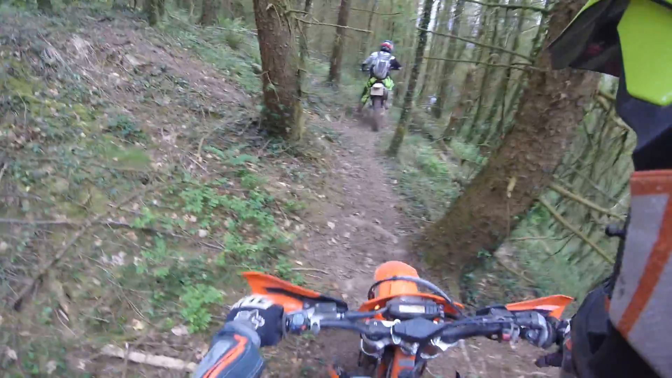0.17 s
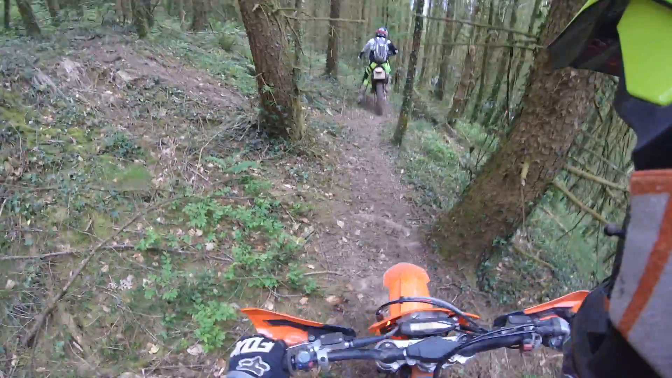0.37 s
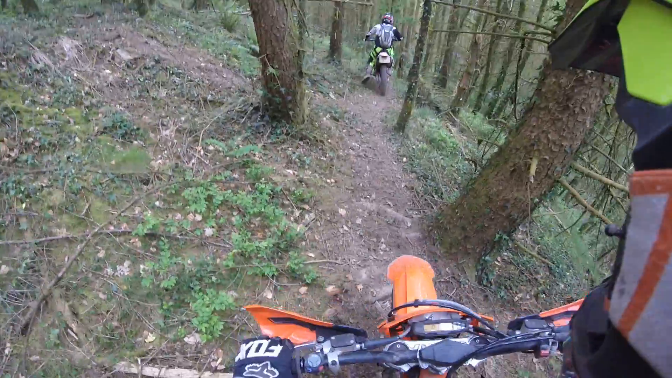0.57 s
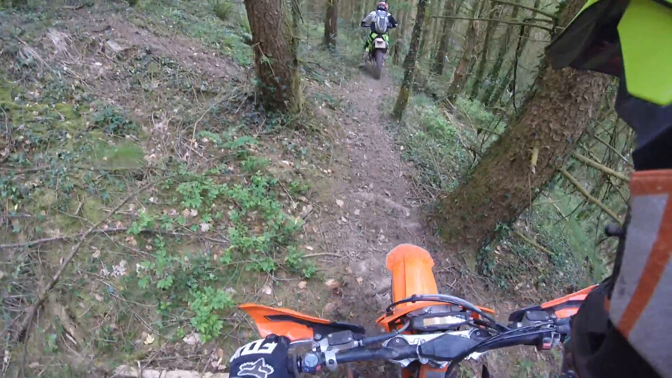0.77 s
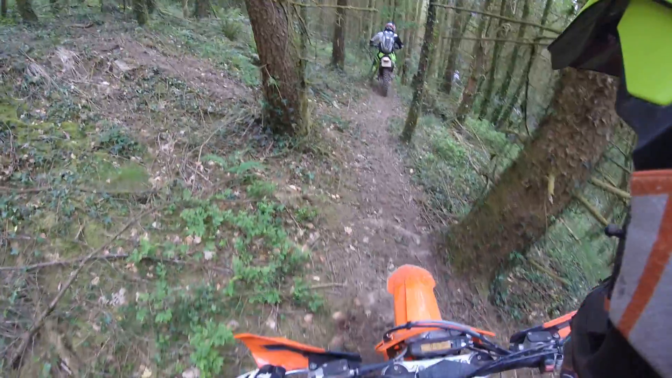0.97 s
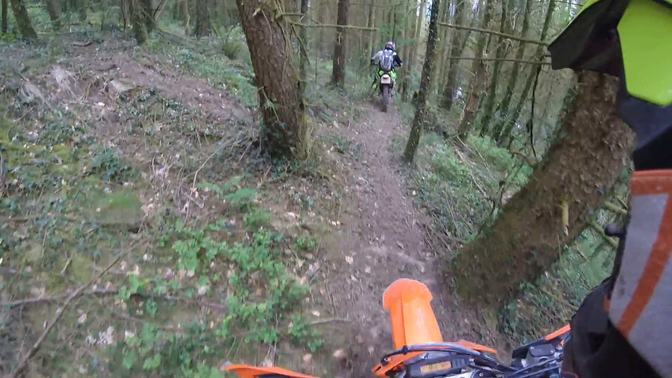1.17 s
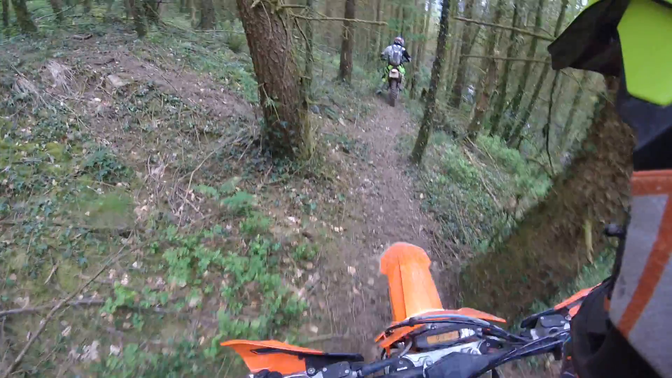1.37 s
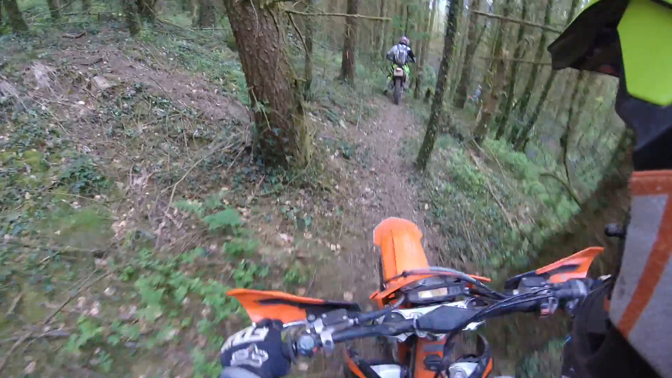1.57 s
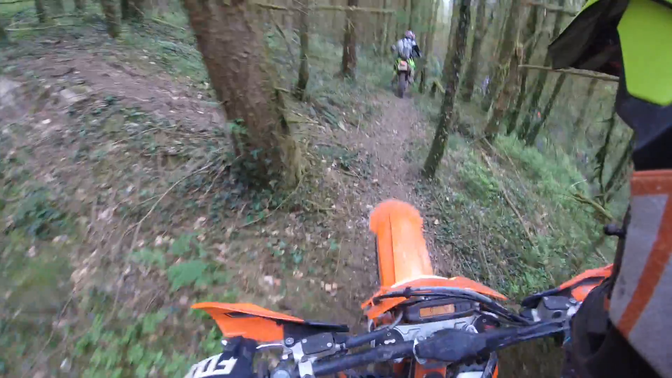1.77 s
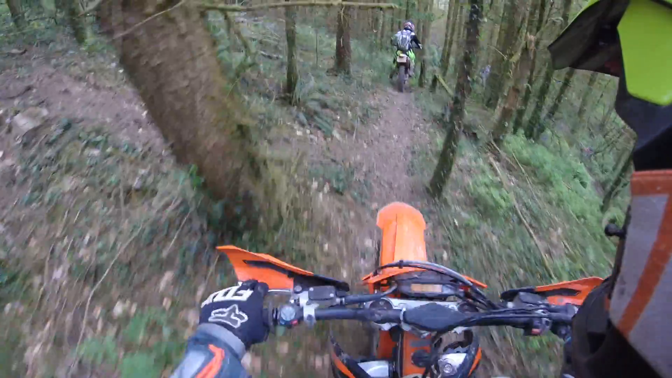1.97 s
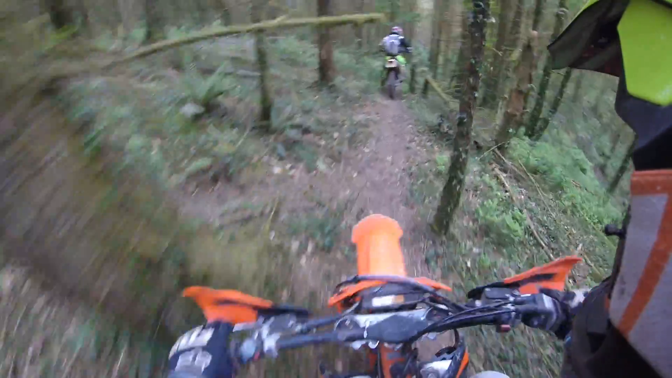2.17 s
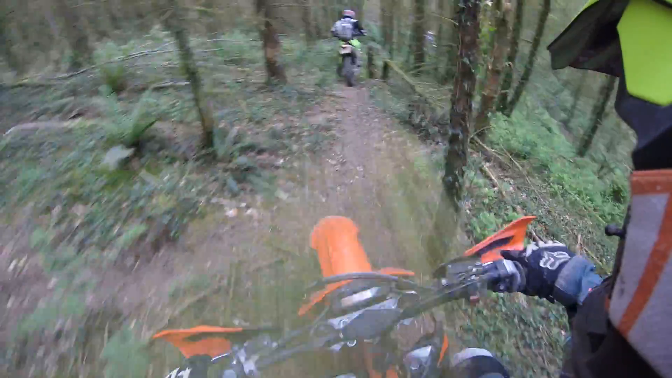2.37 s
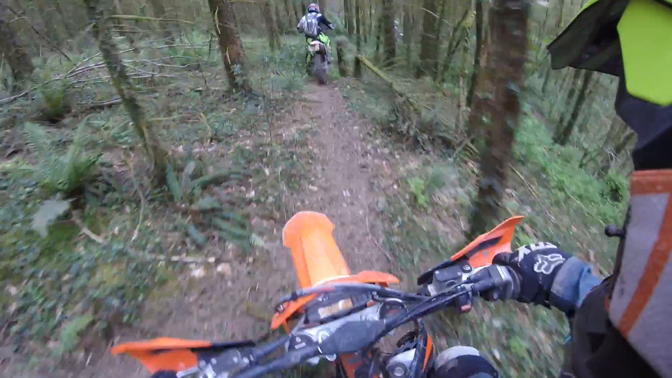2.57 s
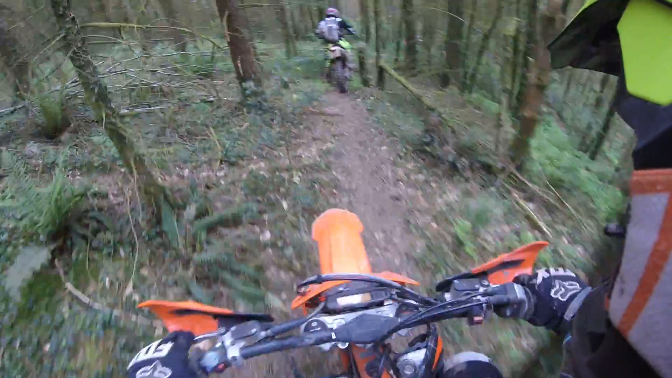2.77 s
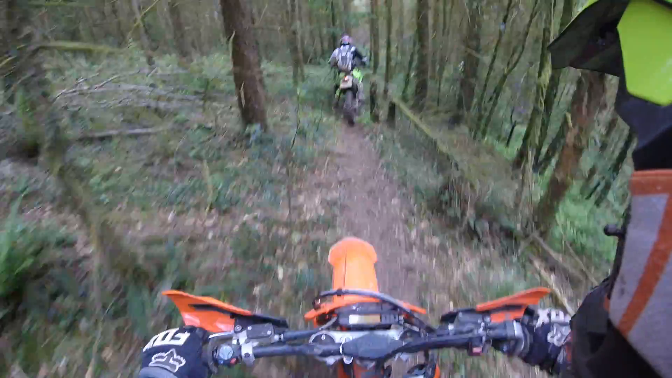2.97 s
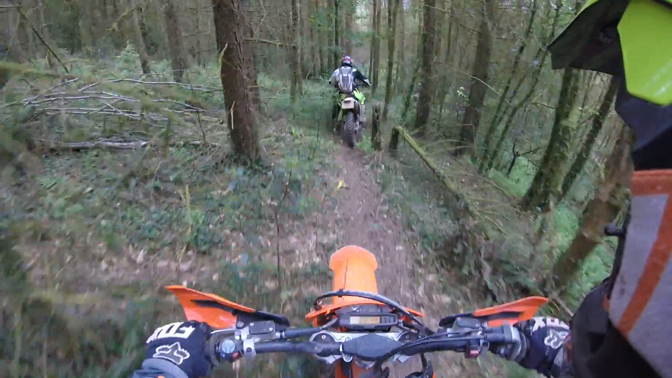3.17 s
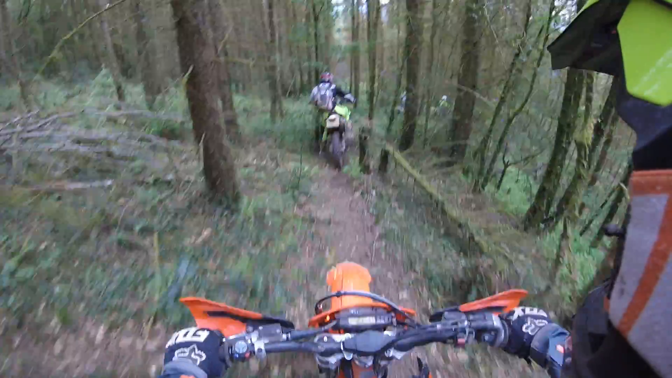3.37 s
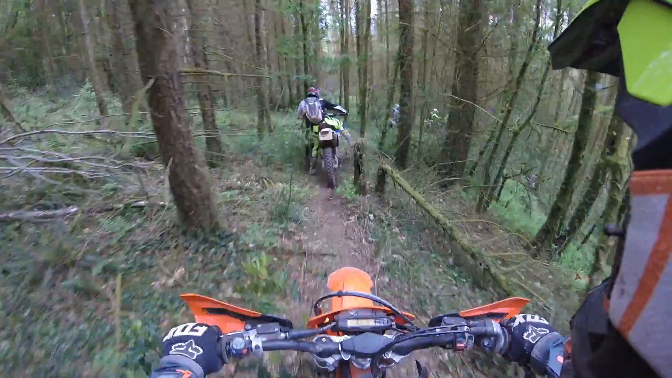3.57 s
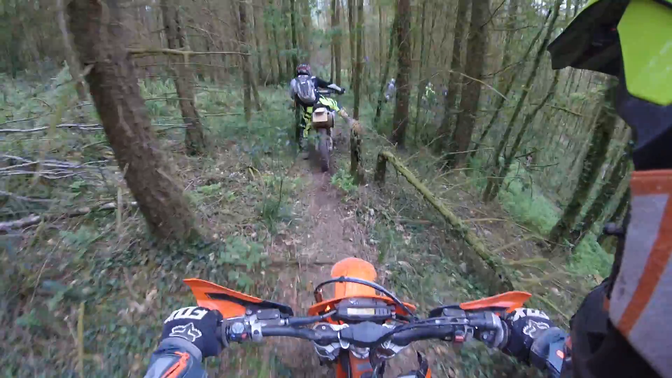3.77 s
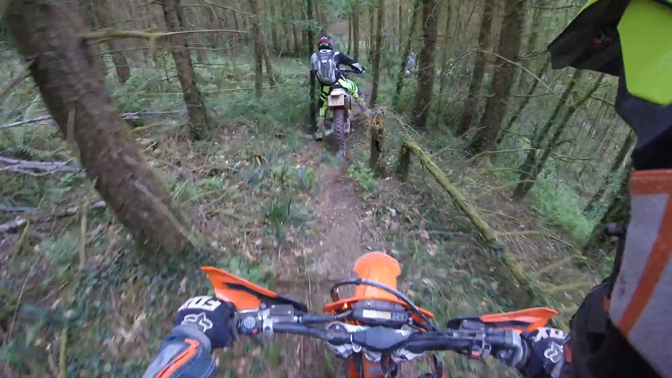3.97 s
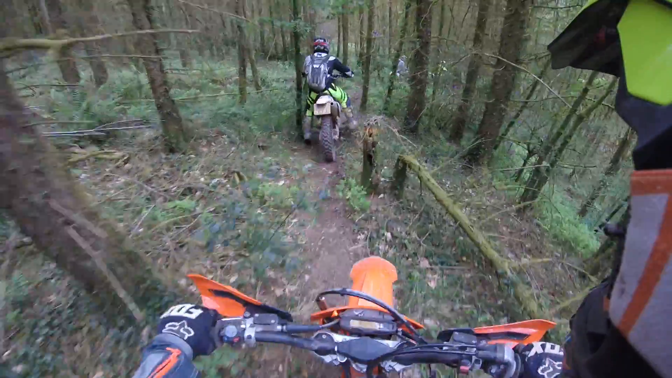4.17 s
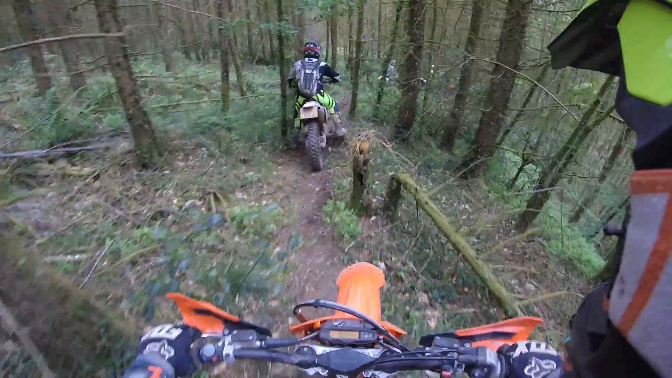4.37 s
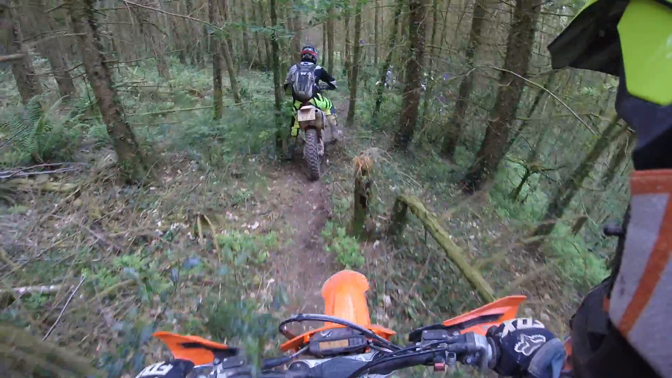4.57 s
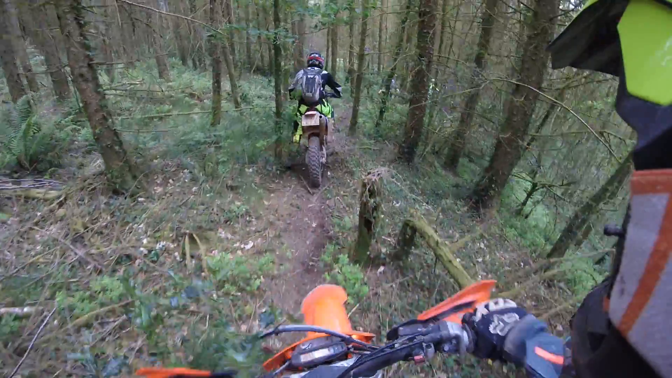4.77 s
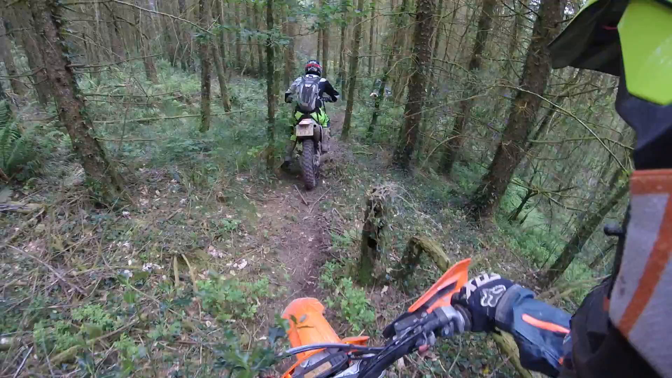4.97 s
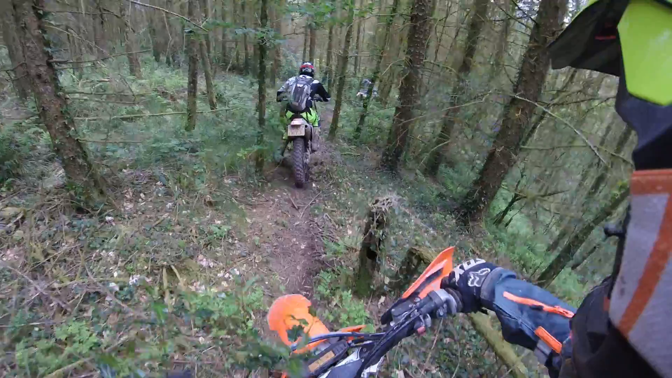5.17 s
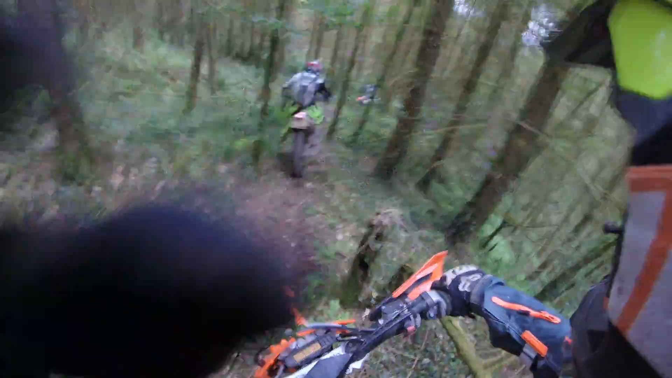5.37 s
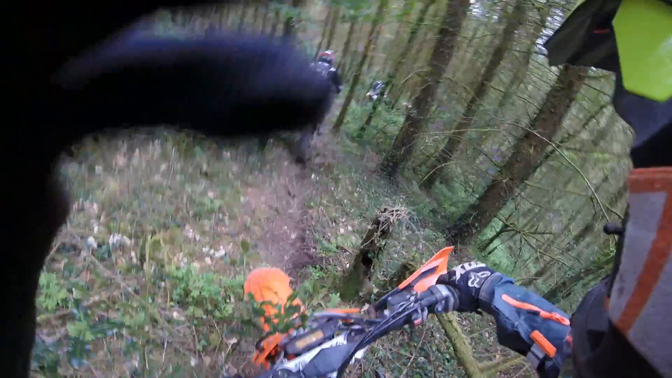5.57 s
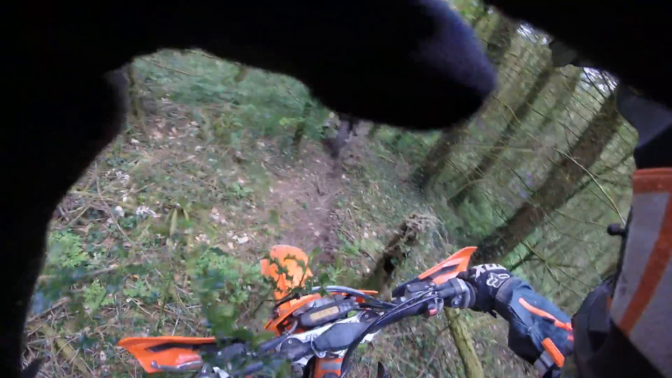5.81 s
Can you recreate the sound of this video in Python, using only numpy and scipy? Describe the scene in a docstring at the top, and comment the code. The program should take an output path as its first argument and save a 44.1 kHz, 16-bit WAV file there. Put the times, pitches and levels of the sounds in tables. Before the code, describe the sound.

A two-stroke dirt bike is heard close up on a woodland trail, boxy through a helmet microphone's closed plastic housing. It starts quietly, with a clattering, misfiring idle and a few light taps. At about 0.8 seconds it blips, then from 1.1 to 2.4 seconds pulls with a wavering, ringing buzz and exhaust hiss. Around 2 seconds a quick cluster of sharp cracks strikes the housing, followed by a gust and a thudding knock at 2.6. The engine falls back to a rattling idle with irregular spitting pops and occasional tiny twig ticks. At 5.5 seconds a gloved hand lands on the housing with the loudest thump and a short scrape, then rubs and clicks again around 5.75. Underneath throughout are low, gusty wind rumble, faint dull tyre crunch and the soft thumping idle of a four-stroke bike ahead.

```python
"""A trail through a wood, heard from a helmet camera in a closed housing on a two-stroke trail bike.
The engine misfires at idle, pulls briefly and idles again: its case clatters, and each firing rings
the pipe and spits hiss. Twigs and jolts knock the plastic housing; at the end a gloved hand lands
on it and wipes it. Underneath, an idling four-stroke thumps ahead, wind rumbles at the housing's
port and the tyres crunch."""
import sys
import numpy as np
from scipy import signal
from scipy.fft import rfft, irfft
from scipy.io import wavfile
from scipy.ndimage import uniform_filter1d, minimum_filter1d

SR = 44100
rng = np.random.default_rng(int(sys.argv[2]) if len(sys.argv) > 2 else 0)


def log_audio(samples):
    """Write samples as a 16-bit WAV file to the path given in sys.argv[1]."""
    # one column per channel
    frames = np.atleast_2d(samples).T
    # limit to full scale, then quantise
    limited = np.clip(frames, -1, 1)
    pcm = np.round(limited * 32767).astype(np.int16)
    wavfile.write(sys.argv[1], SR, pcm)


N = 257544
T = np.arange(N) / SR

# two-stroke crank through idle, blip, pull and idle: t/s, speed/(turns/s)
CRANK_SPEED = [(0.0, 25.0), (0.7, 24.5), (0.83, 38.8), (0.92, 39.0), (1.08, 31.11), (1.13, 33.35),
               (1.29, 40.39), (1.48, 35.38), (1.7, 31.6), (1.81, 35.61), (1.97, 32.84), (2.11, 37.16),
               (2.24, 33.73), (2.42, 36.93), (2.75, 29.2), (3.05, 24.9), (3.65, 27.3), (4.4, 24.3),
               (5.45, 26.5)]
# start and end of the pull, throttle open and every turn firing: t/s
THROTTLE_OPEN = [(1.09,), (2.41,)]
# lone firings of the stumbling idle: t/s, hiss level/dB, pulse level/dB
IDLE_POPS = [(0.117, -60, -54), (0.3203, -69, -52), (0.4502, -55, -51), (0.566, -54, -65),
             (0.6926, -49, -53), (0.783, -74, -33.5), (0.8276, -57, -36.5), (0.861, -55, -29.5),
             (0.8846, -44.5, -30.5), (0.9134, -60, -34), (0.9632, -45, -27), (1.0177, -43.5, -35),
             (1.075, -50, -32.5), (1.132, -47.5, -70), (2.552, -46, -52.5), (2.722, -44.5, -42),
             (2.895, -46, -45), (3.037, -43, -48), (3.1325, -48.5, -44), (3.253, -43, -41),
             (3.4071, -45, -41), (3.5608, -43.5, -42), (3.7435, -44.5, -38.5), (3.8, -53, -62),
             (3.8308, -48.5, -46), (3.875, -50, -50), (3.9265, -47, -40), (4.0914, -44.5, -39),
             (4.29, -45, -43), (4.4528, -48, -40), (4.568, -48.5, -56.5), (4.774, -46, -41),
             (4.941, -46, -37), (5.0963, -45, -39), (5.13, -54, -61), (5.2498, -46.5, -57),
             (5.3716, -45, -66.5), (5.401, -42, -56), (5.4273, -59, -58)]
# ring of the expansion chamber: f/Hz, relative level/dB, t60/s
PIPE_MODES = [(258, 6, 0.055), (345, 0, 0.045), (440, -3, 0.04), (530, -6, .035), (612, -3, 0.05)]
# colour of the exhaust spit: f/Hz, relative level/dB
HISS_EQ = [(700, -6.5), (1100, -29), (1500, 7.5), (2100, -14.5), (3000, -0.5), (4200, -14), (5300, -24),
           (6100, -11), (7200, -18.5), (8400, -15.5), (10000, -26.5), (15000, -38)]
# engine case clatter, before crank speed lifts or lowers it: t/s, level/dB
CLATTER_FADER = [(0, -58.5), (.2, -54), (.46, -49.5), (.76, -45.5), (.9, -46.5), (1.5, -44.5), (2.2, -42),
                 (2.6, -45.5), (3.5, -45.5), (5.2, -43)]
# colour of the clatter: f/Hz, relative level/dB
CLATTER_EQ = [(210, -5.5), (350, -11), (700, -8.5), (1000, -13), (1470, -9), (2130, -12), (2930, -5.5),
              (5290, -26.5), (6110, -23.5), (8410, -29), (14700, -50), (15900, -52)]
# boxy peaks the air in the housing gives the clatter: f/Hz, width/Hz, lift/dB
HOUSING_PEAKS = [(1463, 243, 15.5), (2603, 196, 7.5), (4470, 830, 0.5), (6090, 230, 8.5), (8100, 180, 0.5)]

# hits on the housing: t/s, crack/dB, rattle t60/s, crack low edge/Hz, thud/dB, contact/ms, sway/dB
HOUSING_HITS = [(.018, -39.5, 0.076, 550, -41.5, 4.8, -70), (0.083, -33.5, 0.016, 614, -37.5, 1.8, -68),
                (0.241, -44.5, 0.048, 530, -38.5, 1.4, -68), (0.315, -56, .03, 437, -46, 2.3, -74),
                (1.953, -2, 0.053, 1596, -30.5, 4.5, -75), (1.975, -22, 0.025, 1300, -73, 2.5, -69),
                (2.043, -19, 0.056, 1190, -45, 4.5, -70), (2.057, -13.5, 0.019, 1370, -34, 5.9, -70),
                (2.068, -20, 0.01, 1120, -70, 2.3, -70), (2.078, -18.5, 0.024, 1750, -34.5, 6.5, -70),
                (2.607, -17, 0.024, 990, -11, 3.34, -27), (3.037, -31.5, 0.064, 1140, -70, 2.5, -70),
                (5.527, -24, 0.048, 1180, 5.5, 7.54, -13), (5.534, -4.5, 0.014, 1310, -70, 3.9, -76),
                (5.741, -16, 0.0081, 1940, -23, 9.3, -24), (5.748, -8.5, 0.0078, 1430, -36.5, 4.8, -27),
                (5.791, -25, 0.0083, 1400, -70, 5.0, -30), (5.802, -19, 0.0073, 1290, -33.5, 4.5, -70)]
# plastic shell ringing freely: f/Hz, relative level/dB, t60/s
SHELL_MODES = [(650, -26, 0.0067), (821, 4.5, 0.042), (1347, -1.5, 0.059), (1573, 3.5, 0.038),
               (1810, 5.5, 0.016), (1900, 5, 0.013), (2353, -9.5, 0.056), (2444, -1, 0.017),
               (2850, 10, 0.0059), (3176, 11, 0.0054), (3090, 2.5, 0.019), (3940, -13, 0.024),
               (4840, -14.5, 0.03)]
# body of the helmet mount: f/Hz, relative level/dB, t60/s
MOUNT_MODES = [(108, -10, 0.19), (146.4, -3.5, 0.044), (194, -6.5, 0.042), (295.6, 2, 0.061),
               (560, -8, 0.048)]
# helmet rocking on the head: f/Hz, relative level/dB, t60/s
SWAY_MODES = [(39.36, 0, 0.43)]
# glove wiping the housing: t/s, scrape level/dB, fizz level/dB
WIPE_FADERS = [(5.526, -21, -24), (5.54, -21.5, -26), (5.56, -29.5, -38.5), (5.6, -38.5, -44),
               (5.63, -44.5, -46.5), (5.66, -47, -53.5), (5.72, -50.5, -51), (5.745, -31, -41),
               (5.77, -45, -44.5), (5.8, -50, -44.5), (5.84, -36, -44.5)]
# midrange scrape of the glove: f/Hz, relative level/dB
SCRAPE_EQ = [(300, -11), (600, -14.5), (1000, -33), (1400, -14), (1900, -7), (2250, -12.5), (2600, -5),
             (3400, -29.5), (4500, -31), (7000, -54)]
# bright fizz of glove and ticks: f/Hz, relative level/dB
FIZZ_EQ = [(2350, -4), (4000, 0), (5340, -6.5), (6070, 1.5), (8630, -5.5), (9360, -13.5), (14700, -19.5),
           (15700, -26), (15900, -40)]
# dry ticks of twigs and grit: t/s, level/dB
TWIG_TICKS = [(1.912, -34), (2.3396, -44), (2.608, -35), (3.626, -47), (4.482, -46), (4.9044, -50),
              (5.028, -47), (5.1846, -52), (5.2934, -48), (5.5371, -18), (5.547, -34), (5.5588, -21.5),
              (5.572, -24.5), (5.598, -24), (5.8032, -55)]
# thin squeaks: t/s, length/s, level/dB
THIN_SQUEAKS = [(0.257, 0.033, -71), (0.337, 0.033, -62), (0.377, .02, -73)]

# idle of the four-stroke ahead: t/s, rate/(firings/s)
FOUR_STROKE_RATE = [(0.0, 16.99), (0.6, 18.11), (1.2, 17.03), (1.8, 19.59), (2.4, 18.35), (2.8, 18.7),
                    (3.2, 18.77), (3.6, 17.94), (4.0, 17.59), (4.4, 18.18), (4.8, 18.86), (5.2, 17.84),
                    (5.5, 18.86)]
# its place in the mix: t/s, level/dB
FOUR_STROKE_FADER = [(0, -59.5), (.5, -54.5), (1.5, -51), (2.5, -52.5), (3, -52), (4, -48.5), (5, -48.5),
                     (5.84, -50)]
# boom of its silencer: f/Hz, relative level/dB, t60/s
SILENCER_MODES = [(75, -18, 0.03), (114.5, 4.5, 0.061), (207, -20, 0.2), (337.3, -8, 0.056)]
# wind bed at the port: t/s, level/dB
WIND_FADER = [(0.0, -60), (0.4, -56.5), (1.1, -49), (1.8, -50), (2.8, -43), (3.4, -49.5), (4.2, -48.5),
              (5.0, -48.5), (5.84, -45.5)]
# gusts on top of the bed: centre t/s, level/dB, length/s
WIND_GUSTS = [(0.954, -43, 0.22), (2.01, -38.5, 0.21), (2.229, -37, 0.14), (2.454, -27, 0.13),
              (2.72, -42.5, 0.34), (3.138, -39, 0.12), (3.715, -41.5, 0.25), (4.758, -45, 0.079),
              (4.954, -45, 0.11), (5.06, -43, 0.069), (5.248, -46, 0.12)]
# colour of the wind: f/Hz, relative level/dB
WIND_EQ = [(10, -30), (20, -4.5), (36, 8.5), (60, -1.5), (100, -12.5), (250, -22.5), (500, -55),
           (1000, -71)]
# tyres on the trail: t/s, level/dB
TYRE_FADER = [(0, -64.5), (.5, -61), (1, -51), (2.4, -58), (2.7, -57.5), (5.84, -58)]
# colour of the crunch: f/Hz, relative level/dB
TYRE_EQ = [(100, -11), (200, 0.5), (350, 0.5), (600, -13.5), (1000, -16.5), (1600, -39.5)]


def two_stroke():
    """The hero engine: one crank drives both the exhaust and the case clatter."""
    cruise_turns_per_s, port_opens_s = 35, 1.076
    speed = uniform_filter1d(curve(CRANK_SPEED), size=1500)
    over_cruise = speed - cruise_turns_per_s
    acceleration = uniform_filter1d(np.gradient(speed) * SR, size=3000)
    turns = np.cumsum(speed) / SR
    turns -= np.interp(port_opens_s, T, turns)  # the exhaust port opens on whole turns
    pull_db = -33 + .7 * over_cruise + .025 * acceleration  # more punch when fast or revving up
    pull_db -= 3 * (T - port_opens_s)  # the throttle eases back through the pull
    return case_clatter(turns, over_cruise) + exhaust(turns, pull_db)


def exhaust(turns, pull_db):
    """Each firing rings the pipe and spits hiss: every turn in the pull, in stray pops at idle."""
    puff_db, puff_t60_s = -48.5, .094
    pop_rise_s, pop_hold_s, pop_t60_s = .003, .005, .15
    t = np.arange(8000) / SR
    firings = strokes(turns, spread_db=.53) * during(THROTTLE_OPEN)
    pulses = firings * amp(pull_db)
    hiss_envelope = signal.oaconvolve(firings, amp(puff_db - 60 * t / puff_t60_s))[:N]
    pop = amp(-60 * np.maximum(t - pop_hold_s, 0) / pop_t60_s) * np.minimum(t / pop_rise_s, 1)
    for start, hiss_db, pulse_db in IDLE_POPS:
        add(hiss_envelope, start, amp(hiss_db) * pop)
        add(pulses, start, amp([pulse_db]))
    pipe = np.append(np.zeros(round(.005 * SR)), ring(PIPE_MODES, .1))  # 5 ms down the pipe
    pipe = band(pipe, 214, 770, order=2)
    pipe = band(pipe[::-1], 240, 583, order=2)[::-1]  # filtered in reverse to round the attack
    bark = signal.oaconvolve(pulses, peak(pipe, 0))[:N]
    return colour(hiss_envelope * rng.standard_normal(N), HISS_EQ) - bark


def case_clatter(turns, over_cruise):
    """Gritty engine case rattle that throbs once a turn and grows with crank speed."""
    throb_db = 3 * np.cos(2 * np.pi * (turns - .1))
    grit_db = 1.22 * wander(41) + 2.7 * np.minimum(rng.exponential(1, N), 3)
    level = amp(curve(CLATTER_FADER) + .5 * over_cruise)
    return level * colour(rough_noise(throb_db + grit_db), CLATTER_EQ, HOUSING_PEAKS)


def housing_knocks():
    """Three layers a hit: ragged shell crack, mount thud (deeper for a longer contact), helmet sway."""
    crack_span, attack_s = 2.34, .00016  # span: top of the crack's band over its low edge
    out = np.zeros(N)
    mount, sway = ring(MOUNT_MODES, .4), ring(SWAY_MODES, .6)
    t = np.arange(3000) / SR
    for start, crack_db, t60, lo_hz, thud_db, contact_ms, sway_db in HOUSING_HITS:
        rattle = rng.standard_normal(len(t)) * amp(-60 * t / t60) * np.minimum(t / attack_s, 1)
        rattle = band(rattle, lo_hz, lo_hz * crack_span)
        damping = max(.031 / t60, 1)  # a firm, brief touch deadens the shell
        shell = ring(SHELL_MODES, .08, polarity=-.96, damping=damping)
        add(out, start, peak(signal.oaconvolve(rattle, shell), crack_db))
        contact = np.minimum(t * 1000 / contact_ms, 1)
        # pressed, then springing back
        push = -np.sin(2 * np.pi * contact) * np.sin(np.pi * contact) * contact ** .55
        add(out, start, peak(signal.oaconvolve(push, mount), thud_db))
        add(out, start, peak(signal.oaconvolve(np.hanning(200), sway), sway_db))
    return out


def glove_wipe():
    """Cloth drags over plastic in dense, uneven slips: a scrape with fizz on top."""
    slips_db = 3 * wander(150) + 3.5 * np.minimum(rng.exponential(1, N), 4)
    drag = rough_noise(slips_db) * during(WIPE_FADERS)
    scrape = colour(drag * amp(curve(WIPE_FADERS)), SCRAPE_EQ)
    fizz = colour(drag * amp(curve(WIPE_FADERS, column=2)), FIZZ_EQ)
    return scrape + fizz


def twig_ticks():
    """Twigs and grit strike in tiny, bright bursts of noise."""
    t60_s = .0075
    out, t = np.zeros(N), np.arange(400) / SR
    for start, db in TWIG_TICKS:
        add(out, start, amp(db - 60 * t / t60_s) * rng.standard_normal(len(t)))
    return colour(out, FIZZ_EQ)


def four_stroke():
    """The bike ahead: a soft silencer thump each firing and a weaker one on the turn between."""
    cycles = np.cumsum(curve(FOUR_STROKE_RATE)) / SR + .2952
    pulses = strokes(cycles, spread_db=2.5) + amp(-21) * strokes(cycles + .5, spread_db=2.5)
    thump = band(ring(SILENCER_MODES, .093), 97, 383, order=2)
    return amp(curve(FOUR_STROKE_FADER)) * unit(signal.oaconvolve(pulses, thump)[:N])


def wind():
    """Air buffets the port: a lumpy low rumble that swells smoothly in each gust."""
    level = amp(curve(WIND_FADER))
    for centre, db, length in WIND_GUSTS:
        level += amp(db) * np.cos(np.pi * np.clip((T - centre) / length, -.5, .5)) ** 2
    return level * colour(rough_noise(4 * wander(8)), WIND_EQ)


def tyres():
    """Tyres roll over the trail with a dull, uneven crunch."""
    return amp(curve(TYRE_FADER)) * colour(rough_noise(3.5 * wander(41)), TYRE_EQ)


def squeaks(pitch_hz=6980):
    """Faint, thin blips of one high tone."""
    out = np.zeros(N)
    for start, length, db in THIN_SQUEAKS:
        t = np.arange(round(length * SR)) / SR
        add(out, start, amp(db) * np.sin(np.pi * t / length) * np.sin(2 * np.pi * pitch_hz * t))
    return out


def amp(db):
    return 10 ** (np.asarray(db) / 20)


def unit(x):
    return x / np.sqrt(np.mean(x ** 2) + 1e-20)


def peak(x, db):
    return amp(db) * x / abs(x).max()


def band(x, lo_hz, hi_hz, order=3):
    return signal.sosfilt(signal.butter(order, [lo_hz, hi_hz], "band", fs=SR, output="sos"), x)


def add(mix, start, sound):
    part = mix[round(start * SR):][:len(sound)]
    part += sound[:len(part)]


def curve(rows, column=1):
    """One column of a table as an automation lane."""
    rows = np.array(rows)
    return np.interp(T, rows[:, 0], rows[:, column])


def during(rows):
    """A gate, open while the table lasts, with 5 ms ramps."""
    return np.clip(np.minimum(T - rows[0][0], rows[-1][0] + .01 - T) / .005, 0, 1)


def colour(x, eq, peaks=()):
    """An EQ curve plus any resonant peaks; white noise keeps its rms."""
    hz = np.fft.rfftfreq(len(x), 1 / SR)
    eq_hz, eq_db = np.transpose(eq)
    db = np.interp(np.log(hz + 1), np.log(eq_hz + 1), eq_db)
    db += sum(lift / (1 + (2 * (hz - centre) / width) ** 2) for centre, width, lift in peaks)
    return irfft(rfft(x) * unit(amp(db)), len(x))


def ring(modes, seconds, polarity=1, damping=1):
    """Struck, decaying sines; negative polarity starts neighbours in opposite directions."""
    t = np.arange(round(seconds * SR)) / SR
    return sum(polarity ** k * amp(db - 60 * t * damping / t60) * np.sin(2 * np.pi * hz * t)
               for k, (hz, db, t60) in enumerate(modes))


def wander(hz):
    """Random drift below hz, rms 1."""
    return unit(signal.lfilter(*signal.butter(2, hz, fs=SR), rng.standard_normal(N)))


def rough_noise(flutter_db):
    """White noise roughened by a moving level, rms 1."""
    return unit(amp(flutter_db) * rng.standard_normal(N))


def strokes(cycles, spread_db):
    """One click of uneven size at each whole cycle."""
    whole = np.floor(cycles).astype(int)
    sizes = amp(spread_db * rng.standard_normal(1000))
    return sizes[whole % len(sizes)] * (np.diff(whole, prepend=whole[0]) > 0)


def scene():
    """The mono mix, foreground to background."""
    foreground = two_stroke() + housing_knocks() + glove_wipe() + twig_ticks()
    return (foreground + four_stroke() + wind() + tyres() + squeaks())[None]


def record(dry):
    """A look-ahead limiter holds peaks near full scale and lets go; a low-pass trims the very top."""
    release_db_per_s, cutoff_hz = 200, 15800
    over_db = 20 * np.log10(np.maximum(abs(dry[0]), 1))
    ahead_db = -minimum_filter1d(-over_db, size=801, origin=-400)  # biggest overshoot in the next 18 ms
    release_db = T * release_db_per_s
    reduction_db = np.maximum.accumulate(ahead_db + release_db) - release_db
    limited = dry / amp(uniform_filter1d(reduction_db, size=41))
    lowpass = signal.firwin(511, cutoff_hz, window=("kaiser", 9), fs=SR)
    return signal.oaconvolve(limited, lowpass[None], "same")


dry = scene()
out = record(dry)
log_audio(out)
```